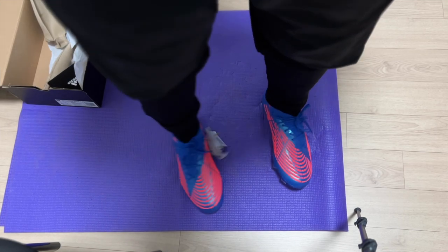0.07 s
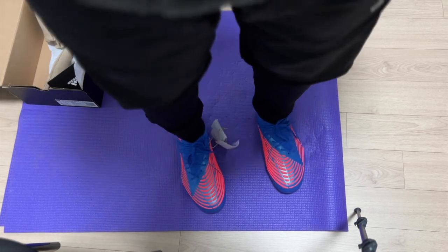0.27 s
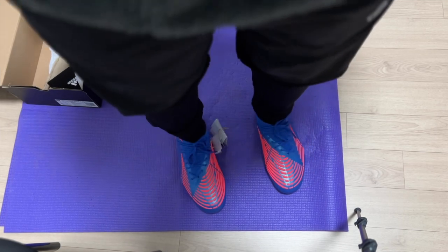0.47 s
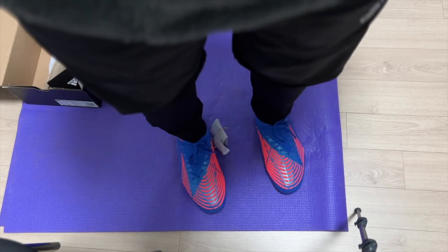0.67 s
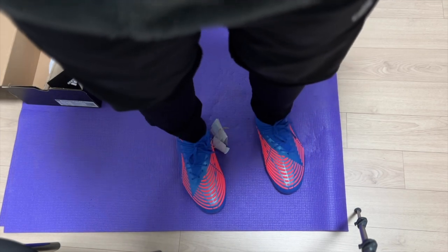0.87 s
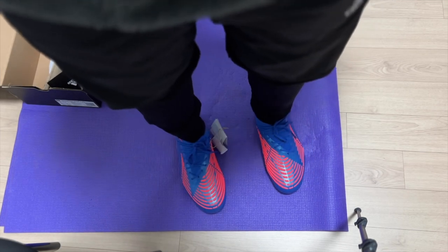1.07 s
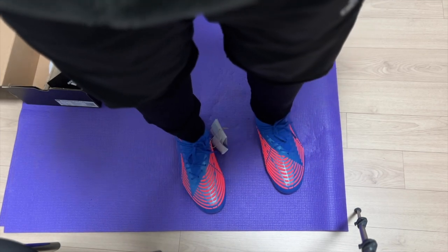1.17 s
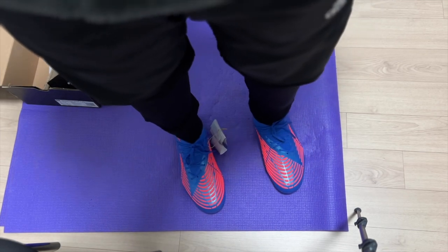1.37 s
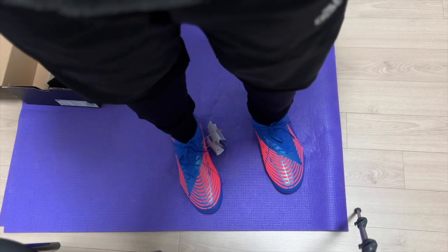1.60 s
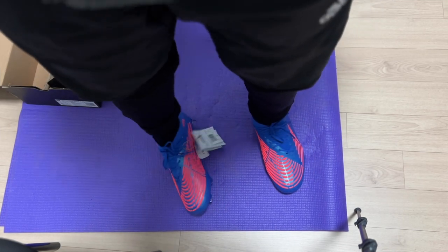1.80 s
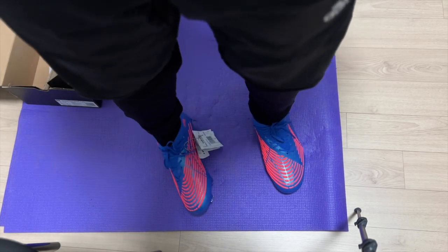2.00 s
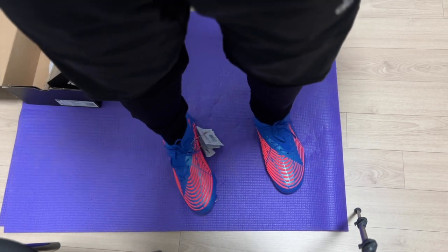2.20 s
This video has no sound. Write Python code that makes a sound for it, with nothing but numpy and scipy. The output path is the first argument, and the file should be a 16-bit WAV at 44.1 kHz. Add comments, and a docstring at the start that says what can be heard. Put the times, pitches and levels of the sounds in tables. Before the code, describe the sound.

Studded boots shift on a soft rubber mat: faint creaks and dull pops, a quick slide with a sharp chattering scrape near the start, then quiet rustling and renewed creaking. Close stereo microphone, small dry quiet room.

```python
"""In a quiet room, studded boots shift on a soft rubber mat. The foam creaks and crackles under the weight as
crowds of tiny grains over beds of coloured noise; studs pop in and out of it and tick as short wavelets.
One sole slides to the right with hiss and thin gliding sine squeals, then ends in a chattering scrape of
uneven stick-slip pulses. A short reverberant tail and faint stereo noise give the room."""
import sys
import numpy as np
from scipy import signal
from scipy.fft import rfft, irfft, next_fast_len
from scipy.io import wavfile
from scipy.ndimage import uniform_filter1d, map_coordinates

SR = 44100
rng = np.random.default_rng(int(sys.argv[2]) if len(sys.argv) > 2 else 0)


def gain_from_db(level_db):
    """Turn a decibel level (scalar or array-like) into a linear amplitude factor."""
    decades = np.asarray(level_db, float) / 20
    return 10 ** decades


def transcribe(u):
    """Save the signal u as a 16-bit wav file named by the first command-line argument.

    u: samples, shape (n,) or (channels, n), limited to [-1, 1]; the rate is SR.
    q: integer samples, one column per channel.
    """
    v = np.clip(np.atleast_2d(u).T, -1, 1)
    q = np.round(v * 32767).astype(np.int16)
    wavfile.write(sys.argv[1], SR, q)


N = 99225
T = np.arange(N) / SR  # s


def unit(x):
    """Normalisation: scale to an rms of 1."""
    return x / np.sqrt(np.mean(x ** 2) + 1e-20)


def along(points, hz):
    """Spectral envelope: (f/Hz, value) points joined on a logarithmic frequency axis."""
    f, value = np.transpose(points)
    return np.interp(np.log(hz + 1), np.log(f + 1), value)


def curves(rows):
    """Time envelopes: one curve for each column after t/s, and a gate that is 1 inside the table."""
    t, *columns = np.transpose(rows)
    inside = (T >= t[0]) & (T <= t[-1])
    gate = uniform_filter1d(inside * 1., size=88)  # 2 ms ramps
    return [np.interp(T, t, column) for column in columns] + [gate]


def wobble(knots_per_s):
    """Random modulation: normal random knots joined by a smooth curve."""
    return map_coordinates(rng.standard_normal(N // 8), [T * knots_per_s])


def filtered(x, response):
    """Linear filtering: multiply the spectrum by a response of frequency."""
    m = next_fast_len(N + 8192)
    return irfft(rfft(x, m) * response(np.fft.rfftfreq(m, 1 / SR)), m)[..., :N]


def causal(x, points):
    """Minimum-phase filtering: (f/Hz, level/dB) colour that rings only after each pulse starts."""
    m = 2048
    log_gain = np.log(gain_from_db(along(points, np.fft.rfftfreq(m, 1 / SR))) + 1e-6)
    cepstrum = irfft(log_gain, m)
    # folding the cepstrum onto positive time makes the answer causal
    cepstrum[1:m // 2] *= 2
    cepstrum[m // 2 + 1:] = 0
    ringing = irfft(np.exp(rfft(cepstrum)), m)
    return np.convolve(x, ringing)[:N]


def wavelets(t_peak, gain, hz, cycles, size=700):
    """Transient oscillation: swings with a quick bell-shaped rise, a slower fall and no net push."""
    rise_over_fall, shortest_cycles = 0.62, .55
    before_peak = size // 3  # samples
    turns = (np.arange(size) - before_peak) / SR * hz[:, None]
    width = np.maximum(cycles, shortest_cycles)[:, None]  # at half height
    life = turns / width * (1 + rise_over_fall)
    halvings = np.where(life < 0, (life / rise_over_fall) ** 2, np.abs(life) ** 1.69)
    swing = -np.cos(2 * np.pi * turns) * 2. ** -halvings
    # a wider, shallower bell cancels the mean
    bell = 2. ** (-halvings / 3)
    swing = swing - bell * (swing.sum(1) / bell.sum(1))[:, None]
    at = (t_peak * SR).astype(int)[:, None] + np.arange(size)
    total = np.bincount(at.ravel(), (gain[:, None] * swing).ravel(), N + size)
    return total[before_peak:][:N]


def sides(pan_db):
    """Level-difference stereo: left and right gains, positive to the left."""
    return gain_from_db(np.array([[.5], [-.5]]) * pan_db)


def spread(x, alike):
    """Interchannel correlation: mix two unrelated signals into a pair of the given likeness."""
    turn = np.arccos(alike) / 2
    shared, opposed = np.cos(turn) * x[0], np.sin(turn) * x[1]
    return np.array([shared + opposed, shared - opposed])


def contacts(rows, pan_db):
    """Impact excitation: each contact is one wavelet, at a slightly different place."""
    t_peak, db, hz, cycles = np.transpose(rows)
    pan_db = pan_db + 1.5 * rng.standard_normal(len(t_peak))
    return np.array([wavelets(t_peak, gain_from_db(db + side * pan_db / 2), hz, cycles, size=1600) for side in (1, -1)])


def foam_pops():
    """Soft contact acts as a low-pass: studs pop dully in the foam, weight shifts with low thumps."""
    # pops in time order: t/s of the peak, level/dB before the low-pass, f/Hz, width/cycles (at least 0.55)
    pop_rows = sorted([(0.0262, -38.5, 590, 0.64), (0.0374, -43, 844, 0.99), (0.0717, -39, 1300, 1.8),
                (0.1124, -33, 1010, 0.8), (0.1649, -33.5, 1260, 1.0), (0.175, -32, 1010, 0.8),
                (0.2467, -31.5, 1570, 2.7), (0.2498, -33.5, 1260.0, 1.2), (0.2888, -24.5, 1750, 0.77),
                (0.3688, -35, 490, 0.53), (0.3834, -35, 410, 1.2), (0.4343, -26, 1400.0, 1.3),
                (0.464, -25, 1320, 0.8), (0.4998, -30.5, 337, 0.69), (0.5126, -36, 990, 4),
                (0.5363, -22.5, 885, 0.32), (0.5478, -29.5, 706, 1.17), (0.5955, -25.5, 960, 0.6),
                (0.6207, -35, 616, 1), (0.6241, -31.5, 880, 0.62), (0.6615, -28.5, 670, 0.81),
                (0.6854, -32, 1120, 0.47), (0.752, -43, 200, 1), (0.7502, -39, 484, 0.5),
                (0.9083, -43.5, 770.0, 0.9), (1.0018, -41, 650, 0.23), (1.2005, -47.5, 473, 2),
                (1.1971, -41.5, 710, 0.47), (1.2399, -43.5, 1620, 1.9), (1.2558, -36.5, 1130, 1.83),
                (1.261, -40, 725, 1.9), (1.3101, -45.5, 600, 1.5), (1.314, -37, 1090, 0.63),
                (1.3659, -37.5, 1490, 2.3), (1.3924, -38, 1210, 0.62), (1.6696, -38.5, 1090, 0.52),
                (1.8971, -38.5, 750, 0.96), (1.9648, -35.5, 910, 0.8), (1.9686, -30.5, 553, 0.64),
                (2.1269, -35, 756, 0.8), (2.121, -44.5, 171, 1), (0.368, -46.5, 159, 0.92),
                (0.387, -46.5, 172, 0.87), (0.468, -43, 160, 0.8), (0.0825, -45, 1940, 4)])
    foam_top_hz = 2560
    pops = contacts(pop_rows, 0.5)
    return filtered(pops, lambda f: 1 / np.sqrt(1 + (f / foam_top_hz) ** 8))


def hard_ticks():
    """Stiff contact excites high frequencies: plastic ticks, first from the right, then near the middle."""
    # ticks in time order: t/s of the peak, level/dB, f/Hz, width/cycles (at least 0.55)
    tick_rows = sorted([(0.1146, -44, 3500, 8), (0.2866, -24, 6300, 4.5), (0.2889, -21.5, 5600, 1),
                 (0.2916, -24.5, 5470, 0.94), (0.2991, -31, 5700, 9), (0.4147, -37, 7100, 1.8),
                 (0.4218, -23, 2000, 1.3), (0.4391, -17.5, 2720, 0.47), (0.4498, -12, 3020, 1.17),
                 (0.4529, -31, 8600, 4), (0.4621, -25, 2880, 7.9), (0.4752, -30, 8000, 2),
                 (0.4772, -22.5, 7350, 3.4), (0.4824, -43, 6670.0, 3.2), (0.5119, -26.5, 3700, 0.49),
                 (0.5355, -32.5, 3350.0, 1.4), (0.5468, -34, 5530, 1.4), (0.6061, -43, 2180.0, 1.4),
                 (0.6535, -43, 1900, 2.4), (0.6841, -37, 2770, 0.96), (0.6969, -42.5, 4200, 0.6),
                 (0.714, -46.5, 4460, 1.8), (0.9592, -42, 2600, 0.51), (1.0024, -43, 2820, 0.84),
                 (1.2557, -49.5, 2880, 1.1), (1.362, -48, 5650, 2.3), (1.366, -41.5, 2650, 1.7),
                 (1.3915, -45, 3500, 0.59), (1.6328, -47, 5600, 1.2), (1.7819, -49, 2870, 1.2),
                 (1.8952, -41.5, 2530, 2.3), (1.9155, -50, 2000, 0.64), (1.9269, -39.5, 4240, 0.67),
                 (1.9425, -43, 2440, 3.7), (1.9652, -40, 2600, 1.8), (1.984, -43.5, 2570, 2.4),
                 (1.9753, -46, 12010.0, 1.6), (2.0454, -49.5, 11420.0, 1.7), (2.0979, -46.5, 4500, 1.5),
                 (.2845, -36, 8760, 4.8), (.2872, -42.5, 13300, 3.3)])
    right_until_s = .47
    early = [row for row in tick_rows if row[0] < right_until_s]
    return contacts(early, -3.5), contacts(tick_rows[len(early):], 0.5)


def scrape():
    """Stick-slip friction: at an uneven rate each slip knocks the sole and lets out a puff of hiss."""
    # scrape: t/s, chatter level/dB, hiss level/dB
    scrape_rows = [(.416, -64, -47), (.421, -30, -35.5), (.433, -31, -43), (.436, -24.5, -61),
                   (.44, -34, -40), (.448, -28, -62), (.454, -30, -55), (.458, -55, -68), (.465, -38, -50),
                   (.474, -37, -42), (.48, -49, -50), (.489, -53, -72), (.496, -46, -46), (.503, -51, -60),
                   (.512, -50, -55), (.522, -43, -74), (.532, -42, -52.5), (.548, -54.5, -53.5),
                   (.565, -56, -88)]
    # colour of the knocking sole: f/Hz, level/dB
    chatter_colour = [(88, -42), (150, -30), (415, -8), (557, -3), (832, -2), (1130, -3.5), (1800, 0.5),
                      (2300, -4), (3290, -4), (6000, -34), (7800, -21), (13200, -120)]
    # colour of the puffs: f/Hz, level/dB
    puff_colour = [(3000, -19), (4500, 1), (6500, -11), (9000, -6.5), (11000, -15), (13500, -21.5),
                   (15000, -23), (15700, -50)]
    slips_per_s, interval_scatter, slip_size_db = 800, .45, 2.5  # rate of the median interval; log scatter

    chatter_db, hiss_db, gate = curves(scrape_rows)
    u = rng.standard_normal((2, 4000))
    at = np.cumsum(SR / slips_per_s * np.exp(interval_scatter * u[0])).astype(int)
    inside = at < N
    slips = np.bincount(at[inside], gain_from_db(slip_size_db * u[1][inside]), N)

    knocks = 0.3 * rng.standard_normal(N) - unit(slips)
    chatter = unit(causal(knocks, chatter_colour))

    puff_decay = np.exp(-np.arange(90) / (0.0008 * SR))  # time constant 0.8 ms
    puffs = 0.48 + np.convolve(slips, puff_decay)[:N]
    hiss = unit(filtered(puffs * rng.standard_normal((2, N)), lambda f: gain_from_db(along(puff_colour, f))))
    chatter_pair = gain_from_db(chatter_db) * chatter * sides(0.3)
    hiss_pair = gain_from_db(hiss_db) * spread(hiss, .88) * sides(-4.1)
    return gate * (chatter_pair + hiss_pair)


def slide():
    """Sliding friction: broadband hiss of the sole, and single studs squealing as frequency-modulated sines."""
    # sliding sole: t/s, hiss level/dB
    hiss_rows = [(.2835, -37), (.293, -36), (.301, -53), (.305, -57), (.318, -51), (.339, -51.5),
                 (.352, -46.5), (.366, -55), (.385, -43), (.397, -62), (.42, -50)]
    # colour of the hiss: f/Hz, level/dB
    hiss_colour = [(1200, -20), (2200, -9.5), (3300, -9), (5200, 1.5), (6800, -4), (8600, -19), (9600, -28),
                   (11000, -42), (15500, -51)]
    # one list for each squeal: t/s, f/Hz, level/dB
    squeal_tracks = [
        [(0.322, 4500, -54), (0.327, 4220, -48), (0.335, 4230, -51), (0.339, 4930, -50)],
        [(.345, 4150, -49), (.355, 4110, -56), (.363, 3860, -51), (.379, 3270, -57), (.39, 3200, -52),
         (.413, 3220, -50.5), (.418, 3250, -56)],
        [(0.343, 5510, -57), (0.354, 5420, -51), (0.362, 5020, -47)],
        [(0.372, 5125, -51), (0.382, 5060, -46.5), (0.392, 4470, -49), (0.398, 4800, -45), (0.416, 4760, -53)],
        [(.366, 7600, -65), (.376, 6900, -60), (.388, 6030, -50), (.396, 6150, -54), (.412, 6000, -51)],
    ]
    waver, flutter_db = .022, 3.5  # waver as a share of the frequency

    hiss_db, gate = curves(hiss_rows)
    hiss = unit(filtered(rng.standard_normal((2, N)), lambda f: gain_from_db(along(hiss_colour, f))))
    out = gate * gain_from_db(hiss_db + 2.1 * wobble(254)) * spread(hiss, 0.18)
    for rows in squeal_tracks:
        hz, db, gate = curves(rows)
        phase = 2 * np.pi * np.cumsum(hz * (1 + waver * wobble(900))) / SR
        out = out + gate * gain_from_db(db + flutter_db * wobble(300)) * np.sqrt(2) * np.sin(phase)
    return out * sides(-5)


def rubbing():
    """Granular noise: each layer is a crowd of grains over a smooth bed around the same pitch, in clumps."""
    # mat and cloth: t/s, then level/dB of foam thud, foam creak, sole crackle, cloth rustle, top treble
    rub_rows = [(0, -75, -61, -58, -66.5, -68), (0.03, -55, -66, -61.5, -61.5, -82),
                (0.055, -66, -60, -62, -66, -83), (0.085, -66, -55, -50, -58.5, -82),
                (0.115, -62, -52, -50, -54, -73), (0.145, -61, -64.5, -55, -60.5, -78),
                (0.18, -60, -50.5, -49, -58.5, -71), (0.215, -45, -44, -46.5, -52.5, -63),
                (0.24, -63, -59, -47, -60, -75), (0.265, -59, -59, -56, -61, -76),
                (0.33, -59.5, -60.5, -57, -66, -74), (0.4, -53.5, -64, -49.5, -57, -88),
                (0.49, -54.5, -52, -68, -47.5, -83), (0.56, -57, -54, -62, -64.5, -96),
                (0.63, -67, -60, -61, -65.5, -73.5), (0.72, -54, -62, -64.5, -62.5, -77),
                (0.76, -55.5, -65, -62.5, -64, -92), (0.79, -74.5, -76, -78, -81, -90),
                (0.87, -66.5, -65, -72, -70.5, -88), (1.01, -53.5, -80, -63.5, -68.5, -89),
                (1.06, -70, -63.5, -70.5, -80, -84), (1.235, -71.5, -79, -78, -74, -86),
                (1.275, -59.5, -57, -55.5, -68, -94), (1.33, -62.5, -60, -60, -70, -86),
                (1.42, -70, -60.5, -58, -67.5, -77), (1.52, -66, -65, -66, -68.5, -84),
                (1.62, -73, -67.5, -70, -70, -80), (1.75, -71, -67, -71, -68, -80),
                (1.8, -58, -51.5, -55, -58.5, -75), (1.84, -50, -45.5, -54, -59, -72.5),
                (1.91, -51.5, -55.5, -59, -60, -71.5), (1.97, -49, -49, -52, -55, -72),
                (2.02, -58, -52.5, -58.5, -65, -79), (2.06, -62, -49.5, -62, -73, -82),
                (2.09, -59, -53, -57, -69, -86), (2.13, -61, -50.5, -59, -65.5, -82),
                (2.17, -62.5, -53.5, -58.5, -67, -84), (2.22, -56.5, -49.5, -59.5, -65.5, -83),
                (2.25, -58, -53, -55, -77, -92)]
    # one row a layer: centre f/Hz, spread/octaves, width/cycles (at least 0.55), rate/(grains/s) (at most
    # 8000 grains in all), size scatter/dB, smooth share of the power/1, left-right likeness/1, pan/dB
    grain_layers = [(286.5, 0.66, 1.11, 460, 3, 0.78, 0.75, 0.3),
                    (606, 0.34, 0.75, 720, 2, 0.52, 0.69, 2.5),
                    (1260, 0.52, 1.2, 1500, 1.5, 0.39, 0.75, 1.2),
                    (3360, 0.55, 1.3, 3700, 4, 0.35, 0.36, 1), (7800, 0.65, 2.7, 5200, 4, 0.15, 0, -1.5)]

    *levels, _ = curves(rub_rows)
    out = np.zeros((2, N))
    clump_db = .9 * wobble(35.4)  # shared by all layers
    for level_db, layer in zip(levels, grain_layers):
        hz, octaves, cycles, rate, scatter_db, smooth, alike, pan_db = layer
        draws = rng.random((2, 3, 8000))[..., :int(rate * N / SR)]
        bell = lambda f: np.exp(-.5 * (np.log2((f + 1) / hz) / octaves) ** 2)
        bed = filtered(rng.standard_normal((2, N)), bell)
        size = int(6 * cycles * SR / hz) + 8
        pair = []
        for (when, pitch, chance), noise in zip(draws, bed):
            grain_hz = np.minimum(hz * 2 ** (octaves * 3 * (pitch - .5)), SR / 3)
            gain = gain_from_db(-scatter_db * np.log(chance + 0.002))  # a few grains stand out
            crowd = wavelets(when * N / SR, gain, grain_hz, cycles + 0 * grain_hz, size=size)
            pair.append(np.sqrt(1 - smooth) * unit(crowd) + np.sqrt(smooth) * unit(noise))
        flicker_db = 1.1 * wobble(60)
        out += gain_from_db(level_db + clump_db + flicker_db) * spread(pair, alike) * sides(pan_db)
    return out


def room(x):
    """Reverberation: convolve with a noise tail whose frequencies each die at their own speed."""
    # decay of the room: f/Hz, t60/s
    decay_times = [(200, 0.036), (2000, 0.028), (10000, 0.15)]
    hz, t, z = signal.stft(rng.standard_normal((2, SR // 3)), SR, nperseg=256)
    decay = gain_from_db(-60 * t / along(decay_times, hz)[:, None])
    tail = signal.istft(z * decay, SR, nperseg=256)[1]
    tail = tail / np.linalg.norm(tail[0])
    late = np.pad(x, (130, 0))[None]  # 2.9 ms before the first reflection
    return signal.fftconvolve(late, tail, axes=1)[:, :N]


def air():
    """Diffuse background: faint noise of room and microphones, its stereo likeness set at each frequency."""
    # colour of the noise: f/Hz, level/dB
    air_colour = [(15, -45), (25, -13), (240, 2), (510, -6), (850, -1), (1270, -6.5), (1500, -5.5),
                  (2120, -6), (3540, -10.5), (8370, -19), (15600, -47.5)]
    # left-right likeness: f/Hz, correlation/1
    air_likeness = [(60, 0.64), (950, 0.068), (3800, 0.083), (15000, 0.028)]

    def mid_side(f):
        turn = np.arccos(along(air_likeness, f)) / 2
        return gain_from_db(along(air_colour, f)) * [np.cos(turn), np.sin(turn)]

    mid, side = filtered(rng.standard_normal((2, N)), mid_side)
    return gain_from_db(-63 + .7 * wobble(5.82)) * unit(np.array([mid + side, mid - side]))


def scene():
    """Superposition of boots, echo and room; the right boot reaches the left side later (time difference)."""
    left_lag_s, room_db = 1.8e-5, -10
    early_ticks, late_ticks = hard_ticks()
    right_boot = early_ticks + slide() + scrape()
    # half the lag delays the left side, half advances the right
    lag = lambda f: np.exp(-1j * np.pi * f * left_lag_s * np.array([[1], [-1]]))
    boots = foam_pops() + late_ticks + filtered(right_boot, lag)
    echo = gain_from_db(room_db) * room(boots.mean(0))
    return boots + echo + rubbing() + air()


def top_cut(x):
    """Nothing passes above the cut-off."""
    return signal.sosfilt(signal.butter(12, 15700, fs=SR, output="sos"), x)


def record(dry):
    """Transducer response: the microphones shape the bass by up to 2 dB."""
    # microphone response: f/Hz, level/dB
    mic_response = [(20, 2), (60, -2), (130, -1.5), (300, 0.5)]
    mix = filtered(dry, lambda f: gain_from_db(along(mic_response, f)))
    return top_cut(mix)


dry = scene()
out = record(dry)
transcribe(out)
```